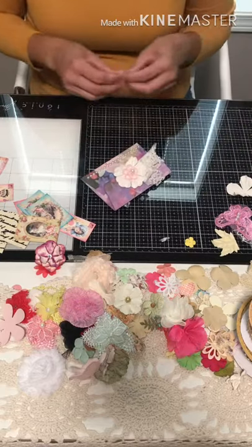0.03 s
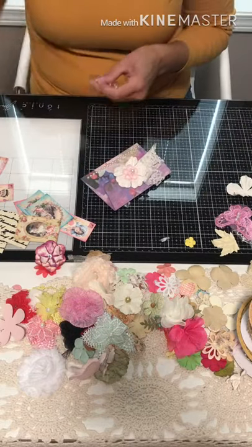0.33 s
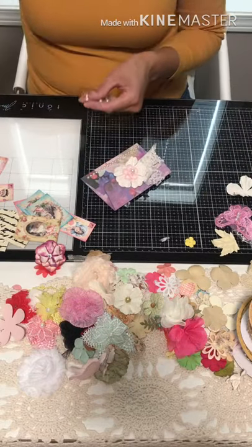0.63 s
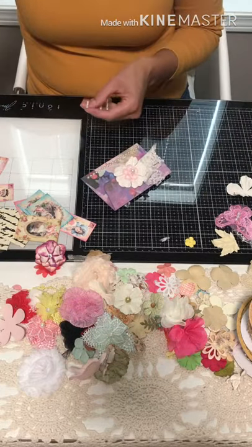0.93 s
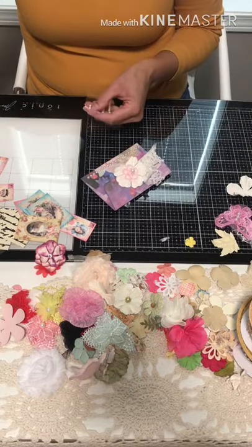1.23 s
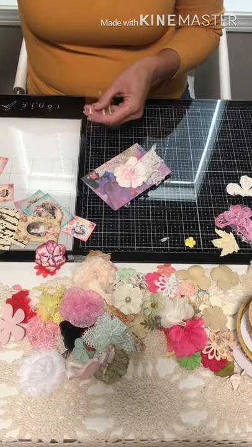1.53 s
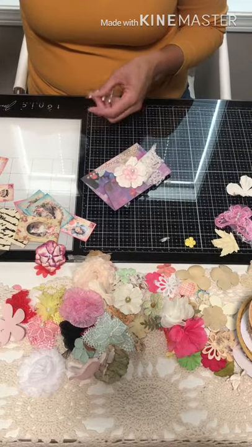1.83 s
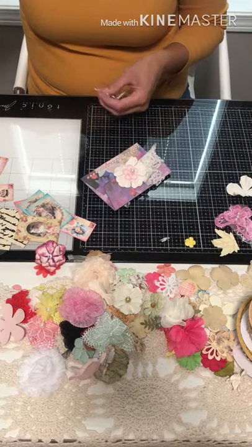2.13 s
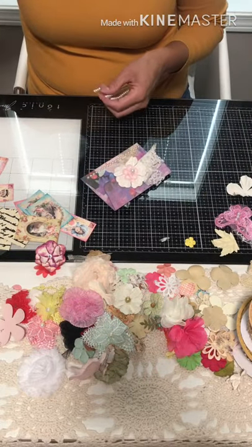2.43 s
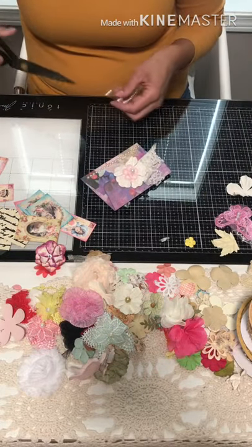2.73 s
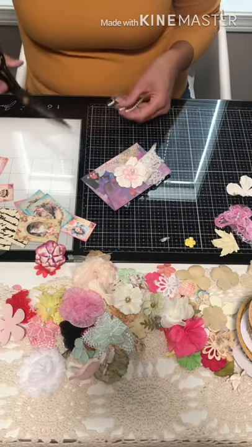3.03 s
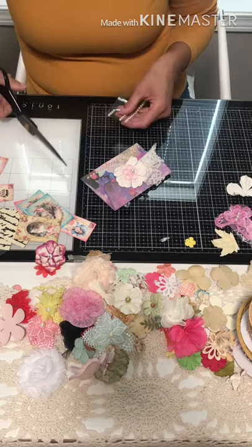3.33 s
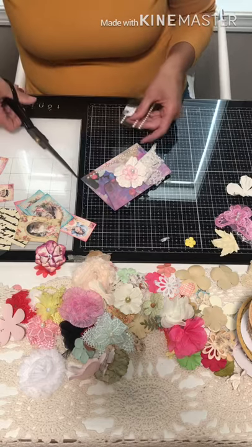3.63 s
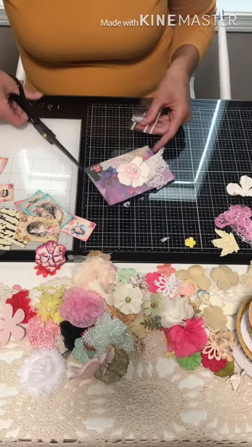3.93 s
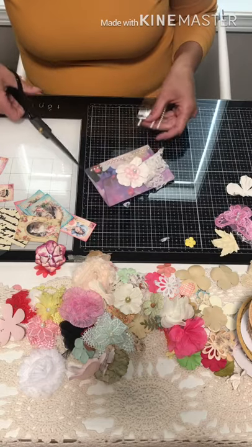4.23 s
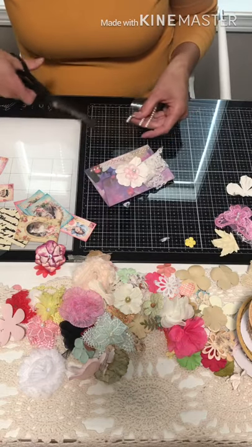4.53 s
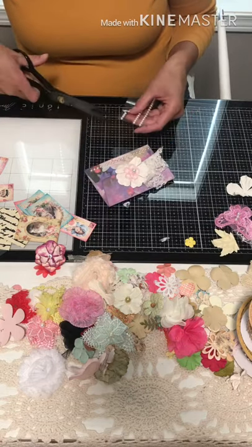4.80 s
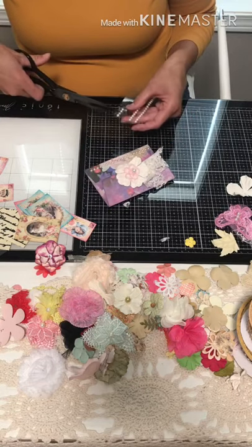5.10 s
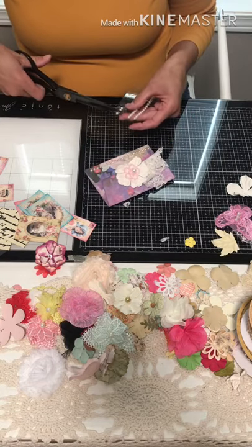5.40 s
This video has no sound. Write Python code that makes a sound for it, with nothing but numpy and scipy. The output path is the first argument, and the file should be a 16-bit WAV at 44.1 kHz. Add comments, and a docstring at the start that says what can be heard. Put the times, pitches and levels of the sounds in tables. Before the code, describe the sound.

Tools clack and thin plastic crackles at a craft table, then scissor tips tap a cutting mat and give a brief squeaky scratch.

```python
"""Tools clack and jostle as one hand rummages for scissors at a craft table in a small room.
Close by, the other hand fingers a thin plastic embellishment that crackles and snaps.
Bumps make the table boom. Once found, the scissors rustle and tick in the grip; their tips
tap the hard cutting mat and ring, then stick and slip in a short squeaky scratch.
A dull knock on the table follows, all over a faint room tone."""
import sys
import numpy as np
from scipy import signal
from scipy.fft import rfft, irfft
from scipy.io import wavfile
from scipy.ndimage import uniform_filter1d

SR = 44100
rng = np.random.default_rng(int(sys.argv[2]) if len(sys.argv) > 2 else 0)


def dump(signal):
    """Clip the signal to [-1, 1] and save it as 16-bit WAV at the path in sys.argv[1]."""
    limited = np.clip(np.atleast_2d(signal).T, -1, 1)
    pcm = np.round(limited * 32767).astype(np.int16)
    wavfile.write(sys.argv[1], SR, pcm)


N = 249606
TIME = np.arange(N) / SR


def from_db(db):
    return 10 ** (np.asarray(db) / 20)


def unit_rms(x):
    return x / np.sqrt(np.mean(x ** 2) + 1e-20)


def at_hz(points, hz):
    """Read a curve on a log-frequency axis."""
    points_hz, values = np.transpose(points)
    return np.interp(np.log(hz + 1e-3), np.log(points_hz), values)


def add(track, start_s, sound):
    """Mix a sound in at a given time."""
    start = max(int(start_s * SR), 0)
    track[start:start + len(sound)] += sound[:N - start]


def colour(x, spectrum, tilt_db=0):
    """Shape a signal with an EQ curve, steep skirts and a tilt per octave; rms 1."""
    hz = np.fft.rfftfreq(len(x), 1 / SR) + 1e-3
    octaves_outside = np.abs(np.log2(hz / np.clip(hz, spectrum[0][0], spectrum[-1][0])))
    gain = from_db(at_hz(spectrum, hz) + tilt_db * np.log2(hz) - 60 * octaves_outside)
    return unit_rms(irfft(rfft(x) * gain, len(x)))


def burst(spectrum, rise_s, t60_s, tilt_db=0, grit_db=0):
    """A contact swells to about rms 1 and its dense resonances die away; grit makes it catch unevenly."""
    t = TIME[:8192]
    rise_s = max(rise_s, 1e-4)
    envelope = np.minimum(t / rise_s, 1) * from_db(-60 * np.maximum(t - rise_s, 0) / t60_s)
    catches = unit_rms(uniform_filter1d(rng.standard_normal(len(t)), size=32))
    noise = colour(rng.standard_normal(len(t)), spectrum, tilt_db)
    return unit_rms(envelope * from_db(grit_db * catches) * noise) * np.sqrt(np.mean(envelope ** 2))


def ring(modes, contact_s, build_cycles):
    """Struck modes build up, then ring out; a long contact leaves the high ones quiet."""
    t, out = TIME[:SR], 0
    for hz, db, t60_s in modes:
        strength = from_db(db) / (1 + (hz * contact_s) ** 4) ** .5
        envelope = (1 - np.exp(-t * hz / build_cycles)) * from_db(-60 * t / t60_s)
        out = out + strength * envelope * np.sin(2 * np.pi * (hz * t + rng.random()))
    return out


def crackle(level_db, spectrum, grains_per_s, spread_db):
    """Rubbing sheds random grains, mostly small, at a changing level."""
    sizes = from_db(spread_db * np.minimum(rng.exponential(1, N), 4)) * rng.choice([-1, 1], N)
    grains = sizes * (rng.random(N) < grains_per_s / SR)
    return from_db(level_db) * colour(grains, spectrum)


# Room tone EQ: freq_hz, gain_db
ROOM_TONE_EQ = [(12, -70), (20, -15.5), (45, -2.5), (107, 2), (146, -4.5), (216, -6.5), (357, -10.5),
                (759, -16), (1000, -14.5), (2140, -20), (2820, -22), (3340, -21.5), (4420, -22.5),
                (4940, -24.5), (16000, -27)]


def room_tone():
    """A steady bed of low rumble and faint hiss."""
    return from_db(-65.5) * colour(rng.standard_normal(N), ROOM_TONE_EQ)


# Reverb decay of the small room: freq_hz, t60_s
ROOM_DECAY = [(150, 0.58), (700, 0.29), (3000, 0.3), (7000, 0.22), (14000, 0.14)]


def reverb(send, predelay_s=0.0037):
    """Dense wall reflections, each octave dying at its own rate."""
    t, tail = TIME[:SR // 2], 0
    edges_hz = np.geomspace(80, 18000, 9)
    for low, high in zip(edges_hz, edges_hz[1:]):
        bandpass = signal.butter(2, [low, high], "band", fs=SR, output="sos")
        band = signal.sosfilt(bandpass, rng.standard_normal(len(t)))
        decay = from_db(-60 * t / at_hz(ROOM_DECAY, np.sqrt(low * high))) * (t > predelay_s)
        energy_share = (high - low) / (SR / 2)
        tail = tail + unit_rms(band * decay) * np.sqrt(energy_share / len(t))
    return signal.fftconvolve(send, tail)[:N]


# Rustle of scissors in the hand: freq_hz, gain_db
GRIP_EQ = [(1180, -16), (2000, 1), (2840, 4), (3640, -5), (3950, 0.5), (7000, -10.5), (9100, -41),
           (15400, -120)]
# Swells as the scissors shift: centre_s, level_db, half_length_s
GRIP_SHIFTS = [(2.65, -78, 0.28), (3.56, -80, 0.024), (4.315, -71, 0.068)]
# Gritty ticks in the grip: crest_s, level_db
TICKS = [(2.556, -53.5), (2.791, -52.5), (3.036, -61.5), (3.143, -63.5), (3.675, -62.5), (4.048, -56.5),
         (5.077, -68)]


def grip(rest_db=-81.5, tick_rise_s=0.0072):
    """Held scissors rustle faintly, swell when they shift and tick now and then."""
    swells = sum(from_db(db) * np.exp(-((TIME - s) / half_s) ** 2) for s, db, half_s in GRIP_SHIFTS)
    out = crackle(20 * np.log10(from_db(rest_db) + swells), GRIP_EQ, grains_per_s=470, spread_db=3)
    for crest_s, db in TICKS:
        tick = burst(GRIP_EQ, tick_rise_s, t60_s=0.065, grit_db=7)
        add(out, crest_s - tick_rise_s, from_db(db) * tick)
    return out


# Bumps on the table: start_s, strength_db, contact_s
TABLE_BUMPS = [(0.736, -27.5, 0.018), (1.047, -34.5, 0.012), (1.513, -28.5, 0.0043), (1.848, -54, 0.00056),
               (4.658, -41, 0.00039)]
# Boomy modes of the tabletop: pitch_hz, gain_db, t60_s
TABLE_MODES = [(112.6, 0, 0.44), (279.6, 7, 0.13), (503, -22, 0.19), (718, -5, 0.23), (1015, 13.5, 0.046),
               (1825, -7, 0.14)]
# Dull rap on the tabletop: freq_hz, gain_db
RAP_EQ = [(130, -41), (190, -13.5), (262, 8.5), (365, -7), (540, -7), (1070, -2.5), (1580, -16.5),
          (1850, -12.5), (2580, -30.5), (2810, -15), (3390, -28), (3920, -20), (7000, -38), (9100, -68),
          (15400, -120)]
# Low thud of the table, also layered under the scissors and tools: freq_hz, gain_db
THUD_EQ = [(76, -21), (130, -0.5), (216, -5), (291, -1), (387, -9), (450, -55), (580, -22.5), (990, -120)]


def table(rap_s=4.6548, settle_s=4.671):
    """Bumps wake the table's boom; the last, hard one also raps and settles with a thud."""
    boom, rap, thud = np.zeros((3, N))
    for start_s, db, contact_s in TABLE_BUMPS:
        add(boom, start_s, from_db(db) * ring(TABLE_MODES, contact_s, build_cycles=1.8))
    add(rap, rap_s, from_db(-32) * burst(RAP_EQ, rise_s=0.0029, t60_s=0.062))
    add(thud, settle_s, from_db(-38.5) * burst(THUD_EQ, rise_s=0.011, t60_s=0.04, tilt_db=3.5))
    return boom + rap + thud + reverb(from_db(-5.5) * rap)


# Glide of the squeaking tip: time_s, pitch_hz, level_db
SQUEAK_GLIDE = [(4.613, 4700, -54), (4.621, 4940, -50), (4.624, 5280, -41), (4.629, 4530, -49),
                (4.636, 3600, -52)]


def squeak():
    """The steel tip sticks and slips at a wavering rate that rises, then falls."""
    times_s, pitch_hz, level_db = np.transpose(SQUEAK_GLIDE)
    waver = .11 * unit_rms(uniform_filter1d(rng.standard_normal(N), size=24))
    cycles = np.cumsum(np.interp(TIME, times_s, pitch_hz) * (1 + waver)) / SR
    envelope = from_db(np.interp(TIME, times_s, level_db, left=-140, right=-140))
    return envelope * np.sin(2 * np.pi * cycles)


# Midrange crack of the tips on the mat: freq_hz, gain_db
TAP_EQ = [(100, -42), (170, -40), (277, -1), (434, -7), (615, 5.5), (848, -13.5), (1420, 4.5), (2560, -7.5),
          (2710, -2), (3070, 4), (3630, -3), (4000, 0), (4800, -28), (6240, -56), (10600, -120)]
# Bright edge on that crack: freq_hz, gain_db
TAP_EDGE_EQ = [(2820, -43), (4800, -14), (5120, -3.5), (6630, -1.5), (8520, -13.5), (10500, -18.5),
               (12600, -26), (16000, -41)]
# Ring of the mat and blades: pitch_hz, gain_db, t60_s
TAP_MODES = [(287, -7, 0.17), (546, -6, 0.15), (635, -2, 0.14), (1382, -5, 0.15), (1453, -8, 0.19),
             (1579, -6, 0.19), (1660, -9, 0.19), (1758, -4, 0.19), (1853, -12, 0.19), (1939, -9, 0.17),
             (2782, -2, 0.16), (2931, -7, 0.18), (3061, -9, 0.19), (3134, -2, 0.19), (3417, -8, 0.19),
             (3797, -11, 0.19), (3869, 0, 0.13), (4090, -2, 0.15), (5142, -13, 0.19), (5275, -9, 0.17),
             (5579, -10, 0.19), (5700, -5, 0.16), (5810, -9, 0.19), (6021, -8, 0.15), (6414, -10, 0.19),
             (6578, -4, 0.12), (6764, -14, 0.19), (6862, -6, 0.13), (7897, -11, 0.12), (8256, -11, 0.11)]
# Hiss of the sliding tip: freq_hz, gain_db
SCRATCH_EQ = [(3820, -43), (6500, -13), (7610, -5), (8850, 0), (11700, 2), (12700, -7), (14600, -10),
              (16000, -3)]


def scissors(tap_s=3.8319, scratch_s=4.6135):
    """The steel tips strike the mat with a crack, a thud and a ring, and later scratch briefly."""
    crack, body, scratch = np.zeros((3, N))
    add(crack, tap_s, from_db(-26) * burst(TAP_EQ, rise_s=0.0026, t60_s=0.069))
    add(crack, tap_s, from_db(-27) * burst(TAP_EDGE_EQ, rise_s=0.0011, t60_s=0.029))
    add(body, tap_s, from_db(-48) * burst(THUD_EQ, rise_s=0.01, t60_s=0.2))
    add(body, tap_s, from_db(-33) * ring(TAP_MODES, contact_s=.00003, build_cycles=0.6))
    add(scratch, scratch_s, from_db(-42) * burst(SCRATCH_EQ, rise_s=0.0074, t60_s=0.029))
    scratch += squeak()
    return crack + body + scratch + reverb(from_db(-7) * crack + from_db(-8) * scratch)


# Fader ride for the rubbing, small snaps and jostling: time_s, level_db
HANDLING_RIDE = [(0, -66), (.45, -72.5), (.75, -75), (1.1, -78), (1.33, -65), (1.45, -59), (1.73, -56),
                 (2.12, -56.5), (2.28, -58.5), (2.36, -66.5)]


def handling_db(time_s):
    """How busy the hands are; silent once they have found the scissors."""
    return np.interp(time_s, *np.transpose(HANDLING_RIDE), right=-120)


# Fingers sliding on plastic: freq_hz, gain_db
RUB_EQ = [(710, -28), (1200, 0), (1350, -4), (3360, -4.5), (4260, -5), (7820, -8.5), (12200, -7),
          (16000, -7)]
# Dry snap of thin plastic: freq_hz, gain_db
SNAP_EQ = [(530, -92), (900, -1.5), (1250, -5.5), (1360, -11), (1850, -3.5), (3380, 0.5), (4310, 2.5),
           (7860, 0), (12400, 1), (16000, -8)]
# Featured snaps: start_s, level_db, tilt_db_per_octave
PLASTIC_SNAPS = [(0.1066, -36, -9), (0.2689, -37.5, -0.5), (0.3012, -39, 9), (0.5034, -30.5, -3),
                 (0.7907, -35, -8), (1.093, -41.5, -2), (1.2514, -38.5, -2), (1.281, -33, 4),
                 (1.424, -43, -8), (1.5723, -35.5, 5), (1.5853, -33, 6), (1.7138, -34, 0.5),
                 (1.7739, -35.5, 4.5), (1.9796, -27, -7), (2.0415, -29.5, -1.5), (2.1037, -28, 4),
                 (2.1185, -20, 5), (2.143, -36, 7), (2.2218, -31.5, -4), (2.3688, -38, -5.5),
                 (4.6086, -37, 15.5), (4.9328, -55, -2), (5.4113, -53.5, -7.5)]


def embellishment():
    """Thin plastic gives single snaps over sparse small ones and a fine crackle of rubbing."""
    busy_db = handling_db(TIME)
    out = crackle(busy_db + 0.2, RUB_EQ, grains_per_s=520, spread_db=1)
    out += crackle(busy_db - 3, SNAP_EQ, grains_per_s=19, spread_db=2)
    for start_s, db, tilt_db in PLASTIC_SNAPS:
        add(out, start_s, from_db(db) * burst(SNAP_EQ, rise_s=0.00043, t60_s=.005, tilt_db=tilt_db))
    return out


# Hollow body of the tool container: freq_hz, gain_db
HOLLOW_EQ = [(250, -19), (430, -14), (507, -0.5), (846, -2), (992, -2.5), (1260, -5.5), (1380, -14),
             (1600, -9), (2080, -14), (3520, -120)]
# Clack of steel tools: freq_hz, gain_db
CLACK_EQ = [(760, -46), (1300, -2.5), (1860, -1.5), (2590, 0.5), (2870, 0), (3500, -12.5), (4560, -8.5),
            (4970, -17.5), (6770, -12), (7020, -29.5), (7500, -24), (9750, -33), (16500, -120)]
# Crisp scuff of plastic tools: freq_hz, gain_db
SCUFF_EQ = [(2000, -19), (3400, 5.5), (3850, 6), (7890, -5), (9530, 0), (10400, -22), (11600, -1.5),
            (12800, -7.5), (15200, -8), (16000, -24)]


def knock(rise_s, level_db, hardness_db, steel_share):
    """Soft contacts wake the hollow container; hard ones clack if steel and scuff if plastic."""
    sudden_db = 2.13 * np.log2(0.0032 / max(rise_s, 1e-4))   # a faster attack clacks more
    firm_db = 0.43 * (level_db + 39)   # a firm knock reaches the table
    thud = from_db(-6.5 - .87 * hardness_db + firm_db) * burst(THUD_EQ, rise_s + 0.00096, t60_s=0.092)
    hollow = from_db(-1 - 1.01 * hardness_db) * burst(HOLLOW_EQ, rise_s, t60_s=0.081)
    clack = from_db(4.5 + .41 * hardness_db + sudden_db) * burst(CLACK_EQ, rise_s, 0.044, grit_db=3)
    scuff = from_db(-1.5 + 1.05 * hardness_db) * burst(SCUFF_EQ, rise_s, t60_s=0.038, grit_db=1)
    surface = np.sqrt(steel_share) * clack + np.sqrt(1 - steel_share) * scuff
    return from_db(level_db) * (thud + hollow + surface)


def jostles(per_s=14, rise_s=.007, spread_db=1.3, steel_share=0.43):
    """Cues for light knocks at uneven intervals, stronger when the hands are busier."""
    cues = []
    for slot, (place, softness, dullness) in enumerate(rng.uniform(-1, 1, (40, 3))):
        crest_s = (slot + (1 + place) / 2) / per_s
        if crest_s < HANDLING_RIDE[-1][0]:
            level_db = handling_db(crest_s) + 4.5 - spread_db * softness
            hardness_db = 4 - spread_db * dullness
            cues.append((crest_s, rise_s, level_db, hardness_db, steel_share))
    return cues


# Featured tool hits: crest_s, rise_s, level_db, hardness_db, steel_share
# Hardness runs from hollow (below 0) to bright; steel share from plastic scuff (0) to steel clack (1).
TOOL_HITS = [(.003, 0.0026, -45.5, 4.5, 0.98), (.074, 0.0041, -53, 3, 1), (.097, 0.0027, -49.5, 8, 0.67),
             (.115, 0.0082, -53.5, 11.5, 0.5), (.141, .009, -60, 15, 0.4), (.294, 0.0012, -56, 9, 0.6),
             (.314, 0.0043, -44.5, 3.5, 0.1), (.324, .004, -42, 5, 0.95), (.572, 0.0074, -55, 4.5, 0.7),
             (.656, 0.0029, -47.5, -1.5, .15), (.666, .002, -45, -9.5, 0.6), (.688, 0.021, -38, 0, 0.45),
             (.781, 0.0024, -44, -5, .12), (.803, 0.0013, -36.5, 0, 0.93), (.843, 0.0083, -48.5, -1, 0.8),
             (.966, 0.0034, -47.5, -3, 0.1), (.986, 0.0023, -39.5, 2, 0.24), (1.110, 0.00095, -34, 2, 0.67),
             (1.188, 0.0012, -43, -3, 1), (1.262, 0.0016, -44, 1, 0.6), (1.358, 0.0043, -45.5, -3.5, 0),
             (1.458, .0007, -39, 2, 0.68), (1.497, 0.011, -45.5, -6.5, 0.8), (1.531, .016, -39, -5.5, 1),
             (1.732, 0.0038, -50, -7.5, .02), (1.848, .002, -35.5, -8, 0.53),
             (1.858, 0.0038, -33.5, 1, 0.3), (1.872, 0.0062, -35, 8.5, 0.64), (2.042, 0.0044, -52, 16, 0.1),
             (2.118, 0.0073, -37, 8, .35), (2.124, 0.0018, -39, 8.5, 0.58), (2.189, 0.0016, -42.5, 3, 0.07),
             (2.244, 0.0075, -44.5, -4, 0.14)]


def tools():
    """Tools clack against each other, with light jostling between the louder knocks."""
    out = np.zeros(N)
    for crest_s, rise_s, level_db, hardness_db, steel_share in [*TOOL_HITS, *jostles()]:
        add(out, crest_s - rise_s, knock(rise_s, level_db, hardness_db, steel_share))
    return out


def scene():
    """Mono mix: the tools lie farther off and get more reverb than the plastic in the hand."""
    bed = room_tone()
    on_table = table() + scissors()
    near = embellishment()
    far = grip() + tools()
    reflections = reverb(from_db(-4.5) * far + from_db(-6.5) * near)
    return (far + near + reflections + on_table + bed)[None]


def record(dry):
    """A steep low-pass cuts the top above 16 kHz."""
    return signal.sosfilt(signal.ellip(10, .2, 70, 16000, fs=SR, output="sos"), dry)


dry = scene()
out = record(dry)
dump(out)
```